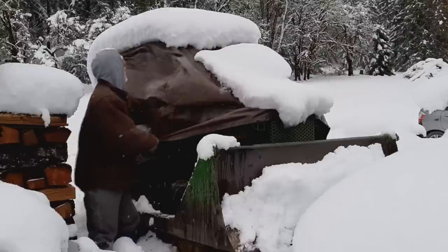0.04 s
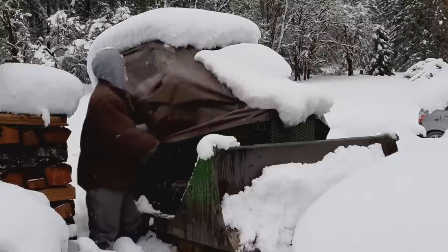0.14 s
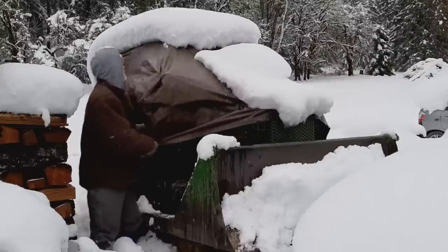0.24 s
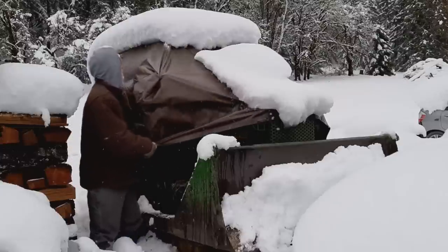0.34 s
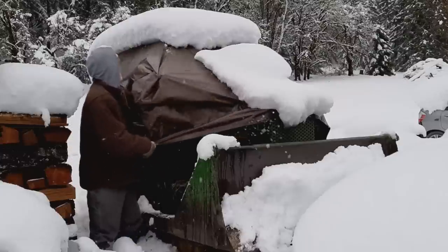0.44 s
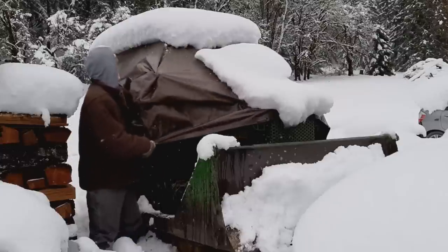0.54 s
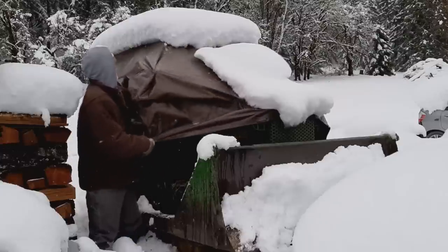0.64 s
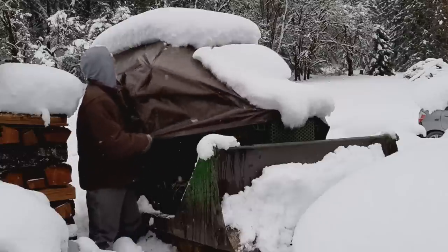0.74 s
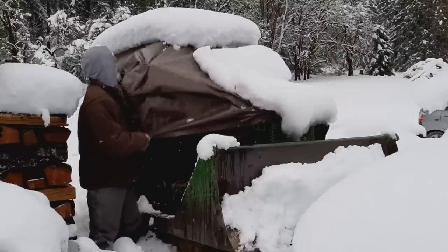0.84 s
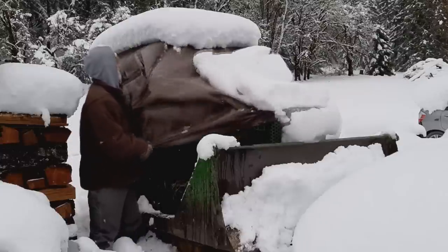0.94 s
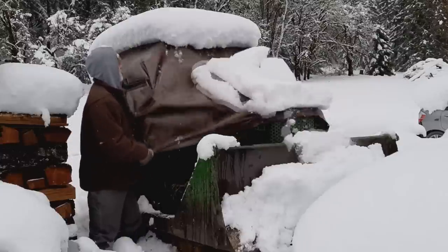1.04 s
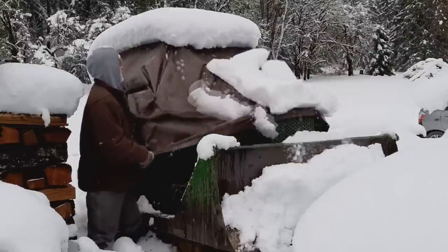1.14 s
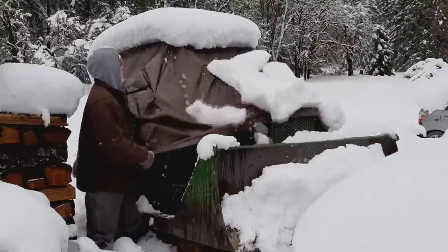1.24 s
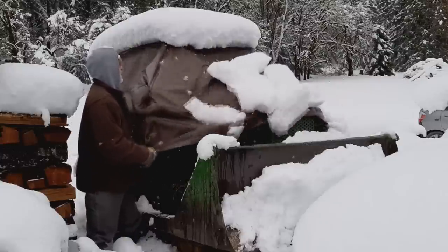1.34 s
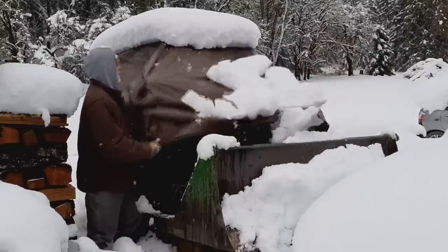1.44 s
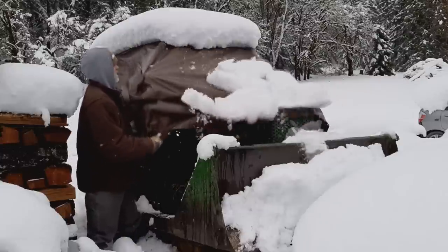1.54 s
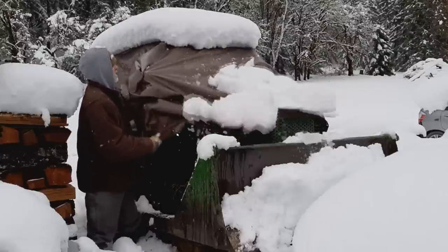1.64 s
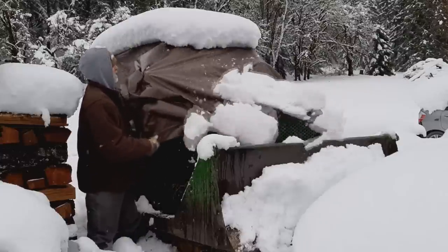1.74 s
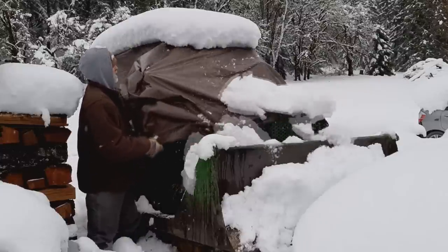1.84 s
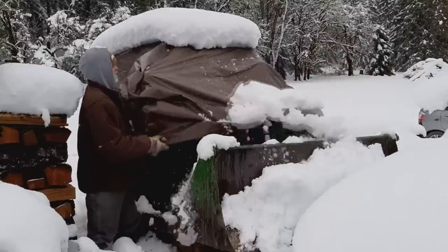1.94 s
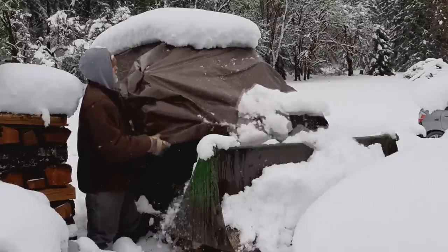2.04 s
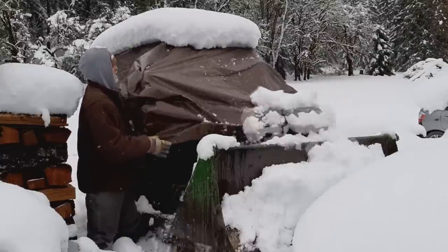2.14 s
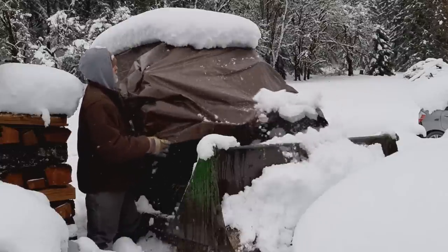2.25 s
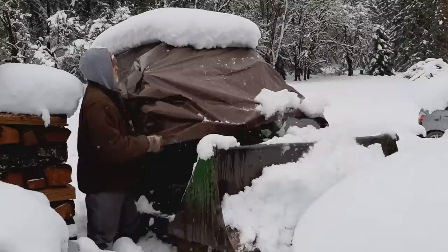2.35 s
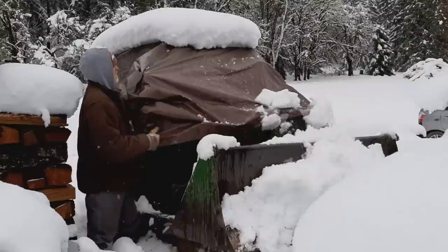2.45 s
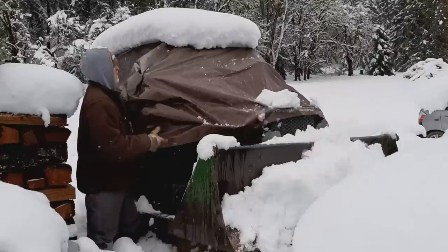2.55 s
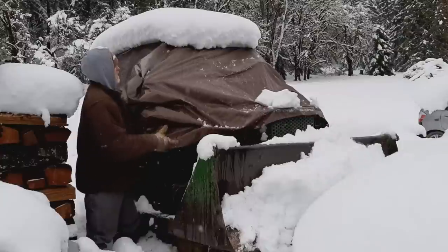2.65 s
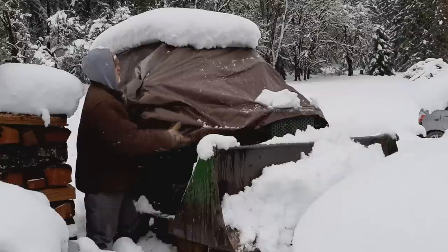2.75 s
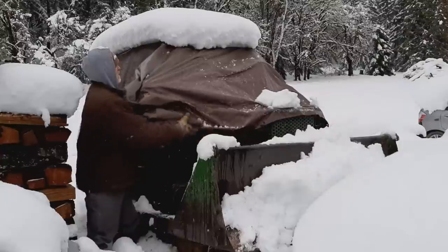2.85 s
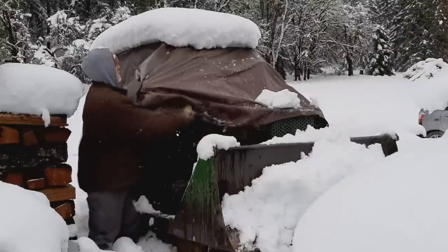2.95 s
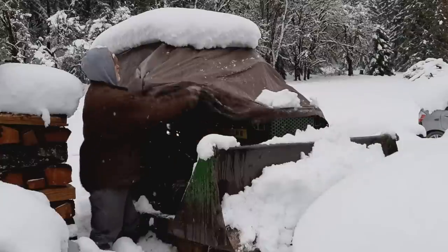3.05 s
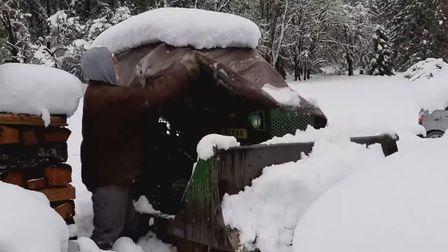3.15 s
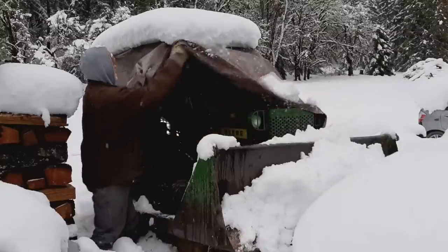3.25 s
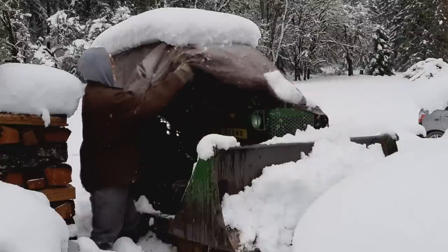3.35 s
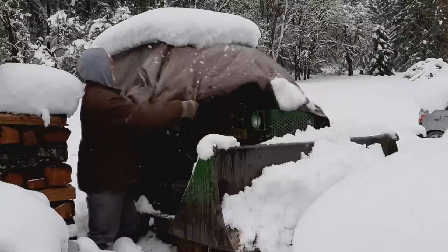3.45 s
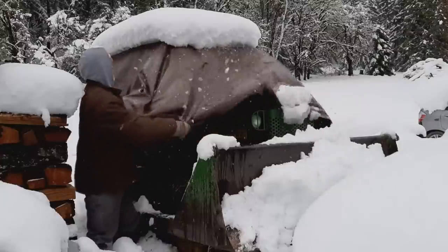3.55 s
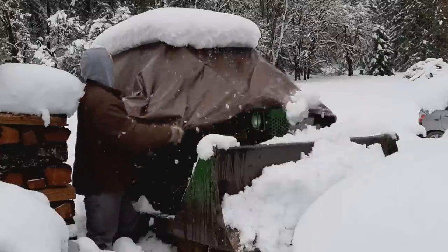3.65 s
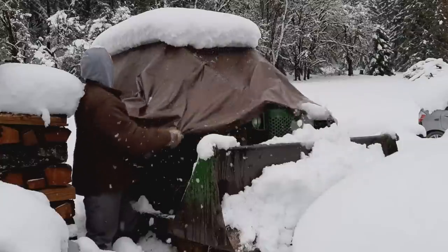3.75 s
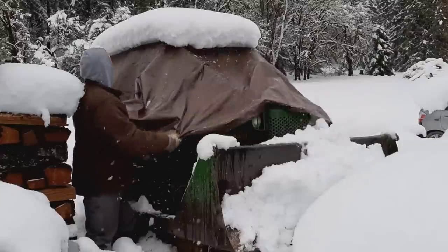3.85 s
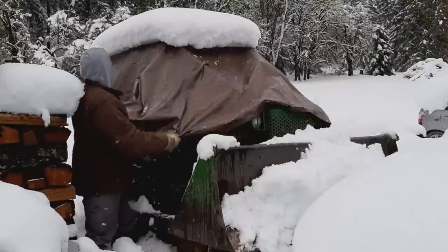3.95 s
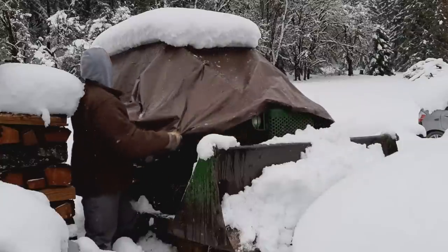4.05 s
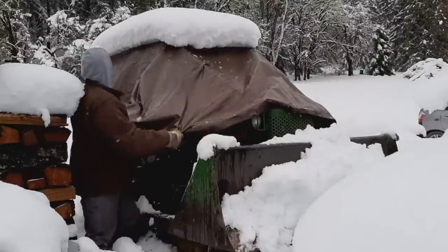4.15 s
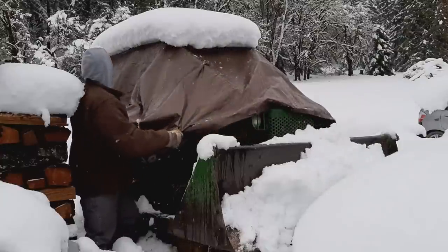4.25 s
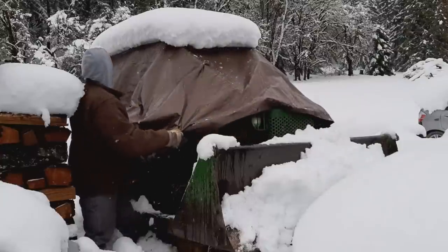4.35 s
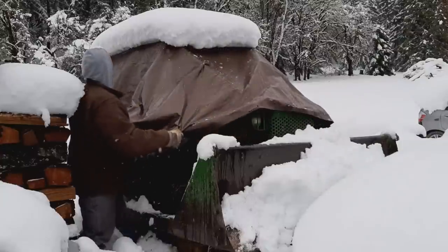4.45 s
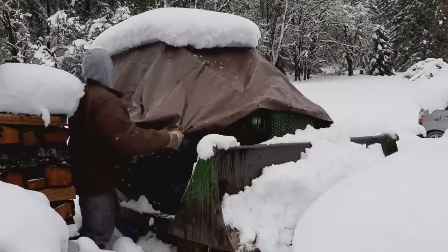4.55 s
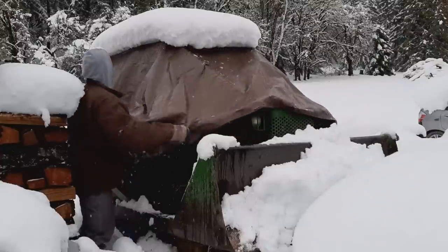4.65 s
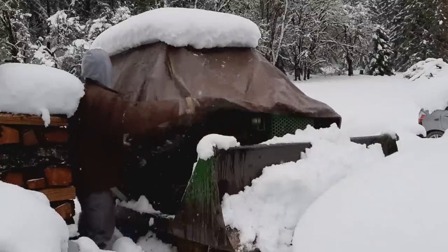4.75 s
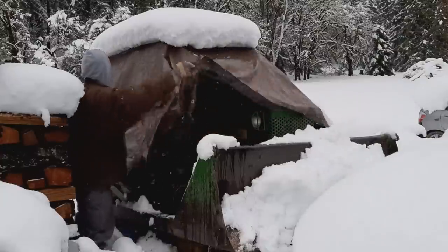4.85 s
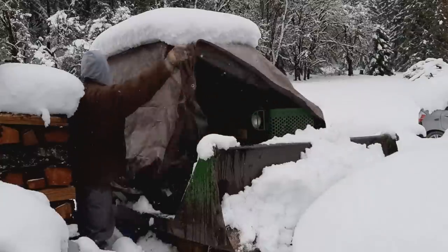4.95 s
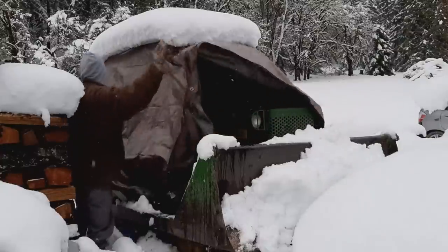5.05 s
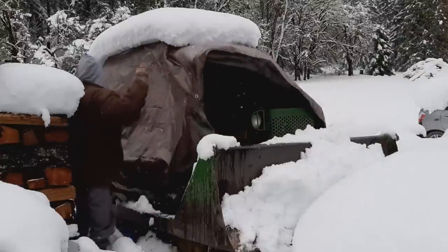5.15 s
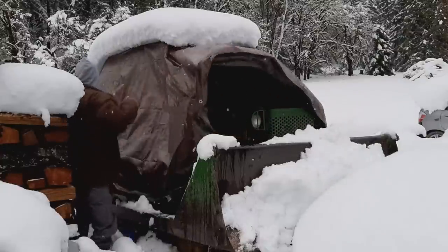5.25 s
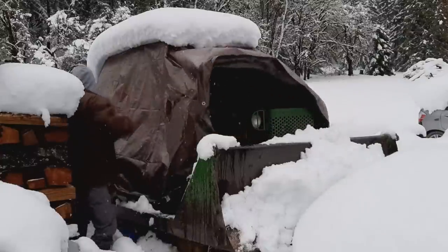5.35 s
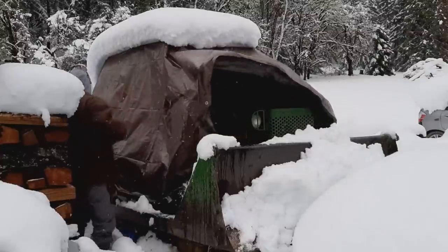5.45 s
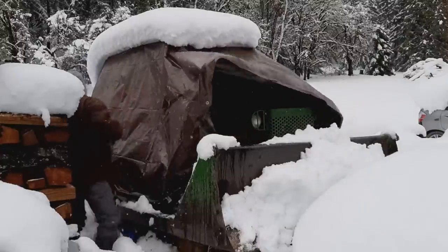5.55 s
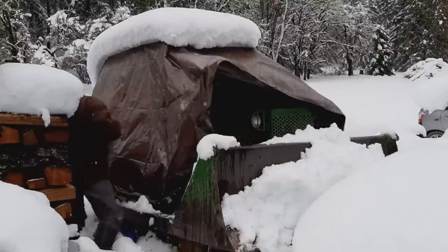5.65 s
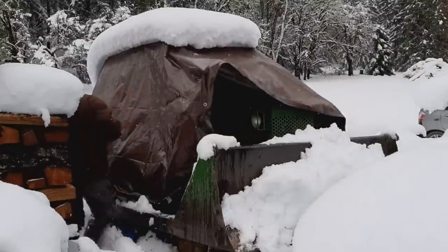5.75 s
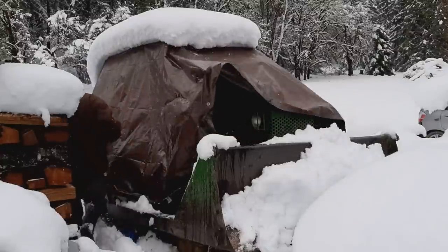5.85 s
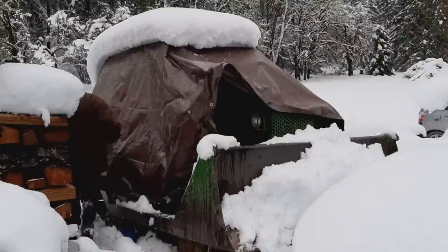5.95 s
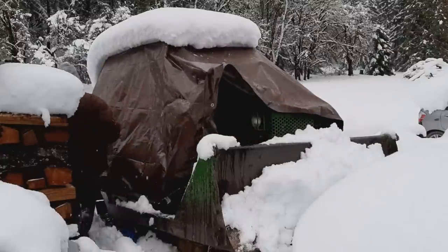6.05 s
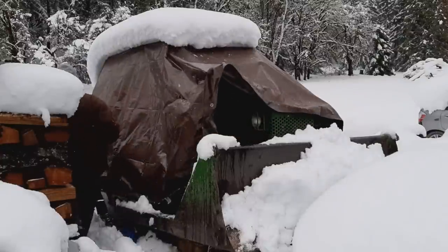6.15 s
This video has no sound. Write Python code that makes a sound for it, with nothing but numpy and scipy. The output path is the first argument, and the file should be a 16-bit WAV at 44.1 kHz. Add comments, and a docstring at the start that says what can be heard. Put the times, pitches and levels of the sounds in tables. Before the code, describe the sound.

A stiff plastic tarp is pulled off a snow-covered vehicle in three main pulls. It crinkles, scrapes and flutters with sharp little snaps, while snow slides off with a grainy hiss. After a short lull comes the loudest pull, with a rush of snow and soft thuds of falling clumps. A last tug fades into light crackles. The sound is a few metres away in a quiet, almost echoless yard.

```python
"""Pulling a tarp off a snowed-in vehicle.

A stiff woven plastic sheet is tugged off in three pulls, a few metres away in an almost echoless yard.
Creases buckle in swarms of tiny clicks, the sheet scrapes and flutters, folds whip and snap, and snow
hisses down and drops in soft clumps. Two close microphone ports hear each click at its own angle."""
import sys
import numpy as np
from scipy import signal
from scipy.io import wavfile
from scipy.ndimage import uniform_filter1d

SR = 44100
rng = np.random.default_rng(int(sys.argv[2]) if len(sys.argv) > 2 else 0)


def generate_wav(signal):
    """Clip the signal to [-1, 1] and save it as 16-bit WAV at the path in sys.argv[1]."""
    frames = np.transpose(np.atleast_2d(signal))
    scaled = np.clip(frames, -1, 1) * 32767
    pcm = np.round(scaled).astype(np.int16)
    wavfile.write(sys.argv[1], SR, pcm)


N = 272967
TIME = np.arange(N) / SR


def amp(db):
    """Amplitude grows tenfold for every 20 dB."""
    return 10 ** (np.asarray(db) / 20)


def unit(x):
    """Normalisation to an rms of 1."""
    return x / np.sqrt(np.mean(x ** 2) + 1e-20)


def spectrum_db(points, hz):
    """Interpolation of a spectrum on a logarithmic frequency axis."""
    f, db = np.transpose(points)
    return np.interp(np.log(hz + 1), np.log(f + 1), db)


def add(mix, start, sound):
    """Superposition: a stereo sound joins the mix at a start time in seconds."""
    part = mix[:, max(round(start * SR), 0):][:, :sound.shape[1]]
    part += sound[:, :part.shape[1]]


def colour(x, curve, size=4096):
    """Minimum-phase filtering by curve(Hz), in dB: being causal, it leaves clicks a sharp front."""
    log_gain = np.log(amp(curve(abs(np.fft.fftfreq(size, 1 / SR)))))
    response = np.exp(np.conj(signal.hilbert(log_gain)))
    taps = np.fft.ifft(response).real[:size // 2]
    return signal.oaconvolve(x, taps[None], axes=1)[:, :x.shape[1]]


def resonate(x, hz, q):
    """A damped resonator passes one broad band."""
    return signal.lfilter(*signal.iirpeak(min(hz, SR / 3), max(q, 3 * hz / SR), fs=SR), x)


def clicks(per_s, spread_db, lag, scatter):
    """Shot noise with path differences: impulses reach the right port lag +/- scatter samples late."""
    total = per_s * N // SR
    left_at = rng.integers(0, N, total)
    left = amp(spread_db * np.minimum(rng.exponential(1, total), 5)) * rng.choice([-1, 1], total)
    delay = np.round(lag + scatter * rng.standard_normal(total)).astype(int)
    right_at = np.clip(left_at + delay, 0, N - 1)
    right = left * amp(0.22 * rng.standard_normal(total))
    return np.array([np.bincount(left_at, left, N), np.bincount(right_at, right, N)])


def unevenness(depth_db, length_s, hop=64):
    """Random amplitude modulation: a gain that wanders as the sheet catches and slips."""
    steps = TIME[::hop]
    window = signal.windows.hann(int(2 * length_s * SR / hop) + 3)
    wander = unit(np.convolve(rng.standard_normal(len(steps)), window, "same"))
    return np.interp(TIME, steps, amp(depth_db * wander))


def driven(x, level_db, size=2000):
    """Envelope shaping: a texture takes on a slow level and keeps its fine grain."""
    power = uniform_filter1d(uniform_filter1d((x ** 2).mean(0), size), size // 2)
    return x / np.sqrt(abs(power) + 1e-12) * amp(level_db)


def scattered(x, t60, wet_db, size=2200):
    """Early reflections from sheet, vehicle and woodpile; long waves reach both ports alike."""
    t = np.arange(size) / SR
    taps = rng.standard_normal((2, size)) * (rng.random((2, size)) < .2) * amp(-60 * t / t60)
    taps[1] += signal.lfilter(*signal.butter(1, 2600, fs=SR), taps[0] - taps[1])
    echoes = signal.oaconvolve(x, taps / np.linalg.norm(taps[0]), axes=1)[:, :x.shape[1]]
    return x + amp(wet_db) * echoes


def crack(hz, t60, size=1200):
    """Impulse response of the sheet, peak 1: a sharp push and a damped shiver around one pitch."""
    shiver = 0.17 * rng.standard_normal((2, size)) * amp(-60 * np.arange(size) / SR / t60)
    push = signal.unit_impulse(size) + shiver[0] + .5 * np.array([shiver[1], -shiver[1]])
    push = resonate(push, hz, q=0.36)
    sound = resonate(push, hz, q=0.9) + 0.37 * push
    sound[1] = np.roll(sound[1], rng.integers(0, 4))
    return sound / abs(sound).max()


def stroke(start, rise, hold, release):
    """Exponential growth and decay of power: up 20 dB per rise until start, down 20 dB per release."""
    before = np.maximum(start - TIME, 0) / rise
    after = np.maximum(TIME - start - hold, 0) / release
    return amp(-20 * (before + after)) ** 2


# Spectrum of the yard's hush. Each row: frequency in Hz, relative level in dB.
AIR_SPECTRUM = [(20, -6), (40, -2), (65, 6), (200, -3), (1000, 3), (4000, -33), (16000, -20)]
def still_air():
    """Partly coherent noise: the two ports share some of the yard's faint hush."""
    hush = rng.standard_normal(N) + 1.2 * rng.standard_normal((2, N))
    return amp(-72) * unit(colour(hush, lambda f: spectrum_db(AIR_SPECTRUM, f)))


# Blows of snow clumps, trapped air and a boot.
# Each row: start in seconds, level in dB, pitch in Hz, time to decay by 60 dB in seconds.
SOFT_BLOWS = [(0.409, -51, 110, .08), (.772, -56, 90, .1), (1.555, -46, 278, .18), (2.28, -56.5, 290, 0.33),
              (2.347, -59, 270, 0.17), (3.061, -59, 169, 0.096), (3.537, -45.5, 75, .12),
              (3.69, -35, 191, 0.11), (3.706, -34.5, 60, .09), (4.966, -46, 210, 0.18),
              (5.561, -53, 94, 0.093), (5.619, -62, 110, .25)]
def thuds(size=16000):
    """Soft, heavily damped impacts give low puffs with no ring, the same at both ports."""
    out, t = np.zeros((2, N)), np.arange(size) / SR
    for start, db, hz, t60 in SOFT_BLOWS:
        swell = (1 - np.exp(-t / 0.005)) * amp(-60 * t / t60)
        noise = rng.standard_normal(2 * size)
        puff = resonate(resonate(noise, hz, q=1.6), hz, q=1.6)[size:] * swell
        strength = amp(db) * np.linalg.norm(swell / swell.max()) / np.linalg.norm(puff)
        add(out, start, strength * np.array([puff, puff]))
    return out


# Spectrum of the drumming sheet. Each row: frequency in Hz, relative level in dB.
FLUTTER_SPECTRUM = [(20, 0), (38, -7), (58, 2), (72, -2), (90, -0.5), (135, -3.5), (185, 3.5), (300, 3),
                    (450, 2.5), (1000, -29.5), (16000, -70)]
def flutter(level_db):
    """Membrane radiation: tumbling snow drums the sheet; only hard bending moves air for deep bass."""
    bumps = clicks(per_s=2500, spread_db=3.5, lag=0.48, scatter=2.5)
    bumps *= unevenness(depth_db=1.2, length_s=0.02)
    drum = driven(colour(bumps, lambda f: spectrum_db(FLUTTER_SPECTRUM, f)), level_db + .2)
    bass = signal.sosfiltfilt(signal.butter(2, 140, fs=SR, output="sos"), drum)
    bass_db = np.clip(0.52 * (level_db + 58), -5, 1.5)
    return drum + bass * (amp(bass_db) - 1)


# Slides down the sheet. Each row: time of full flow, rise, hold and release in seconds, level in dB.
SNOW_SLIDES = [(.95, .8, 0.78, 0.78, -39), (2.015, 0.38, 0.027, 0.72, -41), (3.263, 0.13, 0.056, .05, -30),
               (3.57, .03, 0.1, .13, -34), (3.83, .23, .3, 0.66, -42), (5.3, .3, 0.22, 0.41, -56)]
def snow_flow(crinkle_db, dust_db=-6.5):
    """Incoherent sources add in power: the level in dB of slides plus dust shaken off by crinkling."""
    slides = sum(amp(db) ** 2 * stroke(*timing) for *timing, db in SNOW_SLIDES)
    return 10 * np.log10(slides + amp(crinkle_db + dust_db) ** 2)


# Spectrum of sliding snow. Each row: frequency in Hz, relative level in dB.
SNOW_SPECTRUM = [(200, -41), (1500, -2.5), (4000, 0), (7500, 1), (11000, -1), (16000, 1.5)]
def sliding_snow(level_db):
    """Granular flow: impacts of ice grains on plastic merge into a hiss, and larger crumbs tick."""
    grains = clicks(per_s=16000, spread_db=3, lag=0.43, scatter=2.8)
    grains *= unevenness(depth_db=0.9, length_s=0.0084)
    ticks = amp(13) * resonate(clicks(per_s=70, spread_db=2.5, lag=0.78, scatter=1.9), 6600, q=1)
    patter = grains + scattered(ticks, t60=0.042, wet_db=-3)
    return driven(colour(patter, lambda f: spectrum_db(SNOW_SPECTRUM, f)), level_db - .3)


def crumbs(snow_db, count=110, follow=0.68):
    """Impact excitation: stray crumbs tick on taut plastic, fading more slowly than the slides."""
    out = np.zeros((2, N))
    for when, pitch, force in rng.random((count, 3)):
        db = follow * snow_db[int(when * N)] - 22 - 11 * (1 - force ** 2)
        add(out, when * N / SR, amp(db) * crack(5000 * 2 ** pitch, t60=0.013))
    return out


# Tugs and shifts of the sheet. Each row: time of full strength, rise, hold and release in seconds,
# crinkling level in dB, then scraping and flutter in dB relative to the crinkling.
SHEET_TUGS = [(.095, 0.45, 0.32, .06, -35, -10, -14), (.22, 0.32, 0.062, 0.14, -31, -6.5, -14.5),
              (.683, 0.028, 0.013, 0.041, -43.5, -8.5, -12), (0.764, 0.011, 0.15, 0.16, -38, -12, -11),
              (1.085, 0.51, 0.057, 0.07, -39, -3.5, -13), (1.25, 0.58, 0.072, 0.86, -35, -10.5, -12.5),
              (1.51, .05, 0.026, 0.48, -35, -7.5, -12), (1.8, 0.27, 0.081, 0.18, -45, -6.5, -14.5),
              (2.02, 0.17, 0.081, 0.32, -43, -7, -12), (2.73, .08, 0.057, 0.69, -54.5, -2.5, -18),
              (3.076, 0.12, 0.024, 0.17, -37, -7, -13.5), (3.216, 0.098, 0.099, 0.32, -29, -10, -17),
              (3.434, 0.15, .01, 0.15, -34, -4.5, -11), (3.54, 0.069, 0.073, 0.18, -29.5, -13.5, -18.5),
              (3.675, 0.079, 0.034, 0.22, -27.5, -9, -14), (3.985, 0.24, .19, 0.11, -45, -8.5, -19.5),
              (4.28, 0.17, 0.025, 0.42, -46, -7.5, -29), (4.831, 0.11, 0.27, .1, -35, -8.5, -17),
              (5.16, 0.27, 0.072, 0.37, -43.5, -7, -12), (5.704, 0.088, .02, 0.46, -51.5, -9, -24),
              (5.955, .04, .068, .17, -57.5, -9, -30), (6.085, 0.092, 0.026, .1, -51.5, -7.5, -24)]
# The sheet slackens as the grip changes. Each row: centre and half length in seconds,
# change of the crinkling in dB, change of the scraping and flutter in dB.
SLACK_SPELLS = [(.64, 0.027, -3, -1.5), (2.552, 0.1, -0.5, -14), (4.65, 0.042, -2.5, 0),
                (5.544, 0.037, -2, -7)]
def tug_levels(settle_db=-10.5, settle_s=0.45, dull_lift_db=3):
    """Common excitation: tugs set the dB levels of crinkling, scraping and flutter, which then settle."""
    power = np.full((3, N), 1e-12)
    tail = amp(settle_db + np.array([[0], [dull_lift_db], [dull_lift_db]])) ** 2
    for start, rise, hold, release, db, scrape_db, flutter_db in SHEET_TUGS:
        shape = np.maximum(stroke(start, rise, hold, release), tail * stroke(start, rise, hold, settle_s))
        power += amp(db + np.array([[0], [scrape_db], [flutter_db]])) ** 2 * shape
    level_db = 10 * np.log10(power * unevenness(depth_db=0.9, length_s=.05) ** 2)
    for centre, half, crinkle_change, dull_change in SLACK_SPELLS:
        slack = np.exp(-((TIME - centre) / half) ** 4)
        level_db += np.array([[crinkle_change], [dull_change], [dull_change]]) * slack
    return level_db


# Spectrum of the dragging sheet. Each row: frequency in Hz, relative level in dB.
SCRAPE_SPECTRUM = [(40, -23), (150, -26.5), (300, -7.5), (420, -4), (550, 1.4), (800, 1), (1100, -3),
                   (1600, -6), (3000, -34), (16000, -40)]
def scrape(level_db):
    """Stick-slip friction: the sheet drags over bodywork and coat in many small, dull slips."""
    slips = clicks(per_s=4000, spread_db=2, lag=1.6, scatter=3)
    slips *= unevenness(depth_db=3.5, length_s=0.012)
    return driven(colour(slips, lambda f: spectrum_db(SCRAPE_SPECTRUM, f)), level_db + 0.62)


# Folds that whip or collapse. Each row: centre in seconds, level in dB,
# half length (Gaussian standard deviation) in seconds, pitch in Hz.
FOLD_COLLAPSES = [(0.108, -29.5, 0.004, 3560), (0.149, -29.5, 0.0051, 1100), (0.255, -32, 0.011, 4000),
                  (0.373, -32.5, .003, 4760), (0.406, -35.5, .004, 3500), (1.296, -37.5, .018, 1600),
                  (3.577, -23, 0.017, 4100), (3.664, -26.5, .003, 1290), (3.709, -25, .0055, 1290),
                  (3.719, -27.5, .008, 1560), (4.391, -41, 0.0046, 1510), (6.124, -51.5, 0.0051, 895)]
def folds():
    """Collective buckling: a whole fold gives way in a short swell of dense crackle."""
    out = np.zeros((2, N))
    crackle = scattered(clicks(per_s=9000, spread_db=1.5, lag=1.8, scatter=2.5), t60=0.0077, wet_db=-13)
    for centre, db, half, hz in FOLD_COLLAPSES:
        t = np.arange(-3 * half, 3 * half, 1 / SR)
        offset = rng.integers(N // 2)
        burst = crackle[:, offset:offset + len(t)]
        rush = unit(resonate(resonate(burst, hz, q=0.67), hz, q=0.67))
        add(out, centre - 3 * half, amp(db) * rush * np.exp(-.5 * (t / half) ** 2))
    return out


def crisp_ticks(level_db, count=380):
    """Isolated buckling: sparse creases of random pitch stand out of the rustle; few are strong."""
    out = np.zeros((2, N))
    for when, pitch, force in rng.random((count, 3)):
        db = 0.79 * level_db[int(when * N)] + 5.6 * force ** 2 + 2.5
        add(out, when * N / SR, amp(db) * crack(1600 * 4.2 ** pitch, t60=0.013))
    return out


# The loudest creases. Each row: start in seconds, relative peak in dB, pitch in Hz, ring time in seconds.
CREASE_SNAPS = [(.086, -18, 6000, .0055), (.0945, -11.5, 4500, .006), (.260, -13, 7000, 0.007),
                (.478, -25, 4130, 0.034), (.6875, -25, 4150, 0.0055), (0.693, -24, 4960, 0.0093),
                (0.7615, -15.5, 4300, 0.0063), (.786, -19, 2000, .009), (0.9963, -14.5, 7400, .005),
                (1.189, -21, 4000, .006), (1.203, -22, 3500, .005), (1.296, -21.5, 2000, .007),
                (1.580, -20, 2050, .006), (2.0255, -26, 4500, .005), (2.052, -26, 5000, .006),
                (2.599, -33.5, 8050, .018), (2.7023, -38.5, 1746, 0.013), (2.761, -28, 8500, 0.0022),
                (2.78, -39, 1500, 0.015), (3.000, -21.5, 5500, 0.0059), (3.0054, -18, 2200, 0.011),
                (3.085, -16, 2500, 0.0085), (3.1345, -19, 4430, 0.012), (3.262, -13.5, 2210, .007),
                (3.662, -15, 4000, .005), (3.7206, -14, 2600, .006), (4.009, -23, 935, .009),
                (4.051, -26, 4000, 0.0065), (4.3875, -24, 6060, .016), (4.692, -34.5, 2000, .009),
                (4.732, -34.5, 1600, .009), (4.7855, -23, 2200, 0.0077), (5.1355, -28, 4500, .011),
                (4.842, -23, 3800, .01), (4.9119, -14.5, 2800, .007), (5.043, -18.5, 2440, 0.0081),
                (5.0706, -19, 4000, .006), (5.3835, -34.5, 5000, .005), (5.534, -34, 2500, 0.025),
                (5.5411, -32, 1700, 0.016), (5.604, -35.5, 7050, 0.011)]
def snaps():
    """Snap-through: a crease flips to another stable shape, with a faint slap from things nearby."""
    out = np.zeros((2, N))
    for start, db, hz, t60 in CREASE_SNAPS:
        add(out, start, amp(db) * crack(hz, t60))
    return amp(3) * scattered(out, t60=.025, wet_db=-9)


# Colouring of the swarm of creases. Each row: frequency in Hz, relative gain in dB.
CRINKLE_COLOUR = [(40, -45), (200, -21), (500, -13), (900, -0.5), (1400, 2.5), (2600, -0.84), (4000, -0.7),
                  (7500, -8), (11000, -15), (16000, -27)]
def crinkle(level_db, sizes=4):
    """Crackling noise: creases of several sizes buckle in clusters, each ringing for a cycle or two."""
    swarm = np.zeros((2, N))
    for hz in np.geomspace(1100, 8000, sizes):
        ticks = resonate(clicks(per_s=1900, spread_db=1, lag=2, scatter=2.5), hz, q=1)
        swarm += scattered(ticks, t60=.018, wet_db=-8)
    swarm *= unevenness(depth_db=1, length_s=0.0069)
    return driven(colour(swarm, lambda f: spectrum_db(CRINKLE_COLOUR, f)), level_db - .3)


def scene():
    """Superposition of tarp, snow and quiet yard, with the tarp slightly to the right."""
    crinkle_db, scrape_db, flutter_db = tug_levels()
    snow_db = snow_flow(crinkle_db)
    tarp = crinkle(crinkle_db) + crisp_ticks(crinkle_db) + scrape(scrape_db) + snaps() + folds()
    snow = sliding_snow(snow_db) + crumbs(snow_db)
    return tarp * amp([[-.45], [.45]]) + snow + flutter(flutter_db) + thuds() + still_air()


# The microphone's response, with a treble notch. Each row: frequency in Hz, gain in dB.
MIC_RESPONSE = [(20, 3.5), (2600, 0.35), (3300, 0.04), (5200, 0), (6500, -.5), (7500, 2.5), (8100, -3.5),
                (8650, -12), (9600, -6), (11300, 0.5), (16000, -2.5)]
# Resonances of its housing. Each row: centre in Hz, width in Hz, gain in dB.
HOUSING_MODES = [(1534, 98, 6.2), (2035, 45, 6.7)]
def record(dry, low_hz=48, high_hz=16000):
    """Linear filtering: the microphone and its resonant housing colour the sound and limit its band."""
    def response_db(f):
        housing = sum(db / (1 + (2 * (f - hz) / width) ** 2) for hz, width, db in HOUSING_MODES)
        return spectrum_db(MIC_RESPONSE, f) + housing

    bass_cut = signal.butter(5, low_hz, "highpass", fs=SR, output="sos")
    treble_cut = signal.firwin(511, high_hz, window=("kaiser", 9), fs=SR)
    heard = signal.sosfilt(bass_cut, colour(dry, response_db))
    return signal.oaconvolve(heard, treble_cut[None], "same")


dry = scene()
out = record(dry)
generate_wav(out)
```